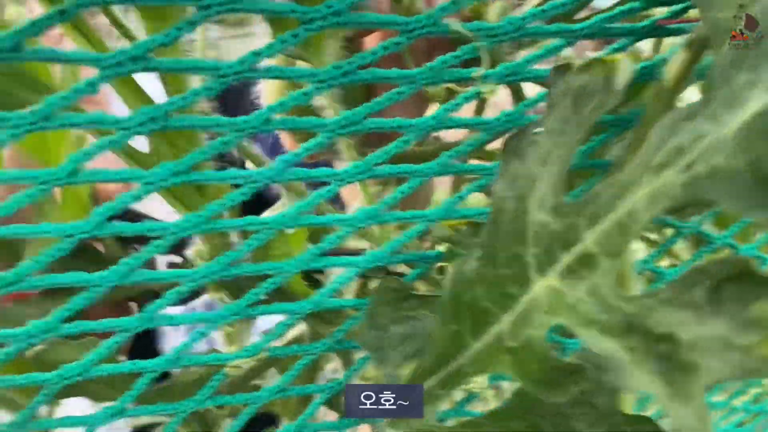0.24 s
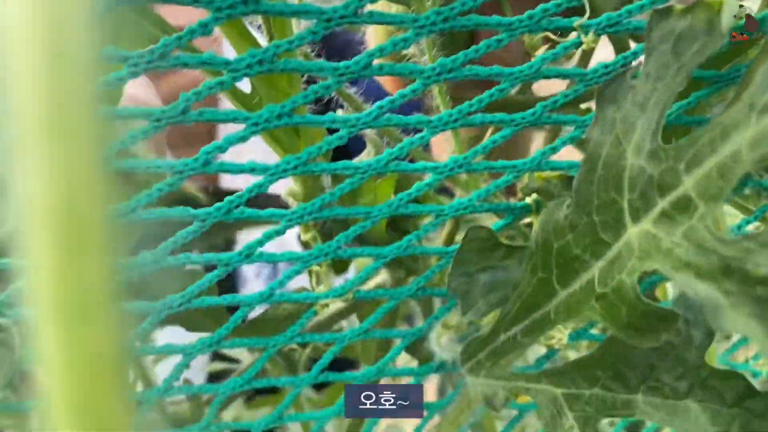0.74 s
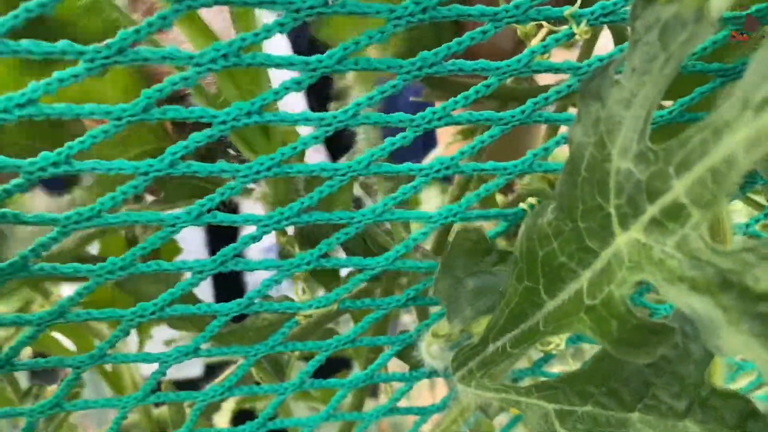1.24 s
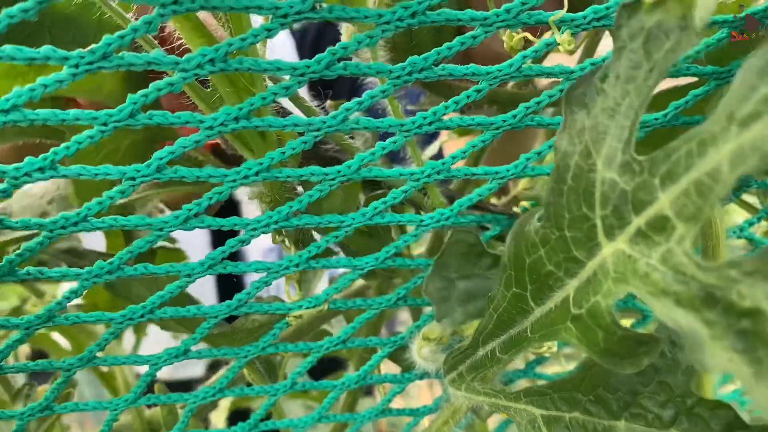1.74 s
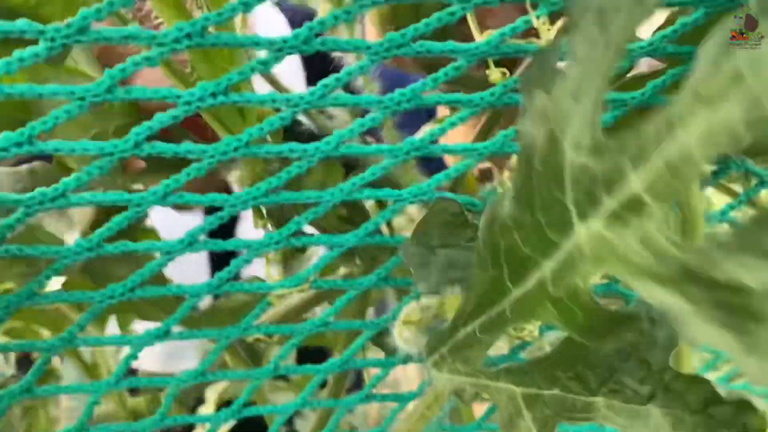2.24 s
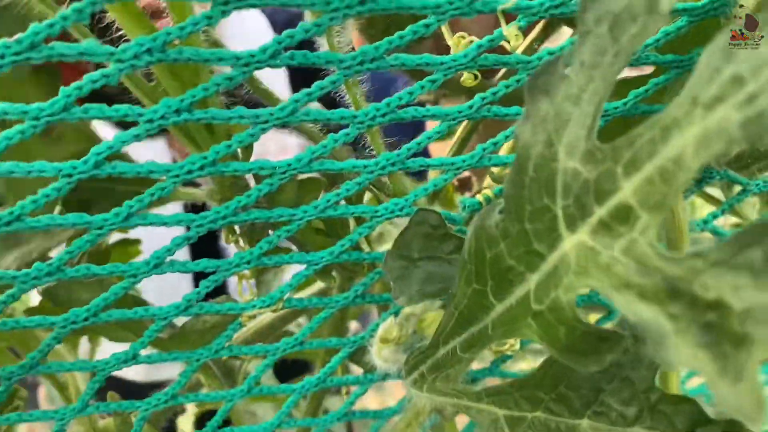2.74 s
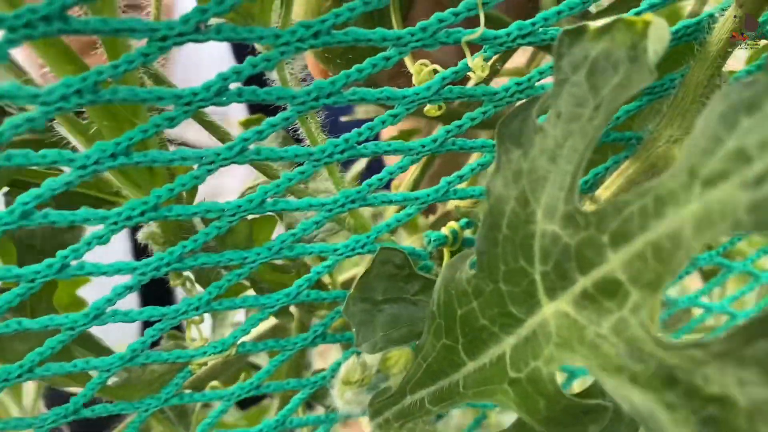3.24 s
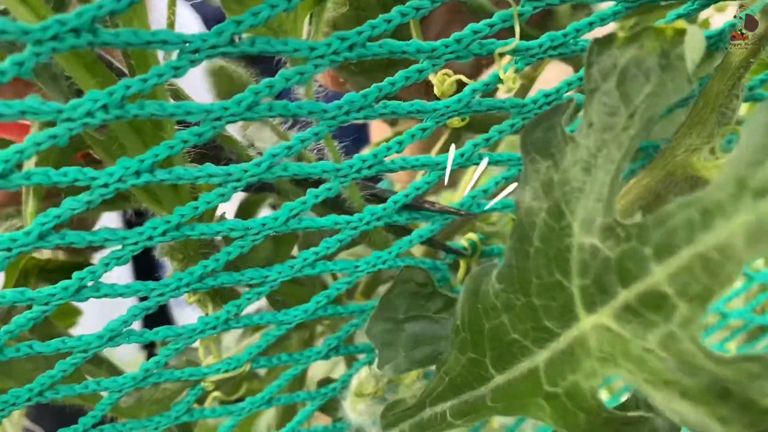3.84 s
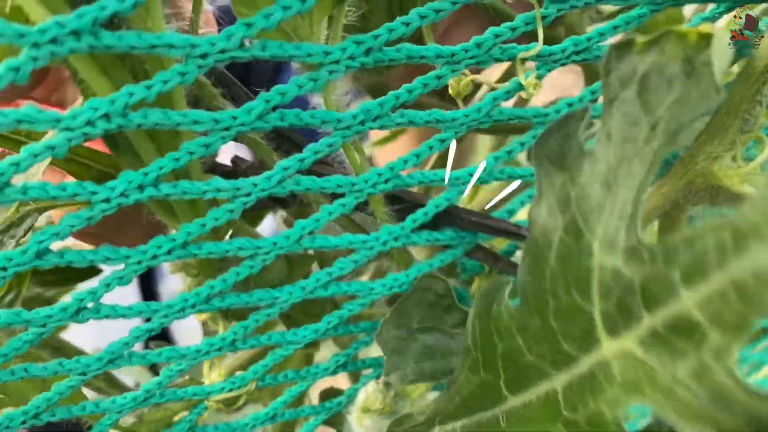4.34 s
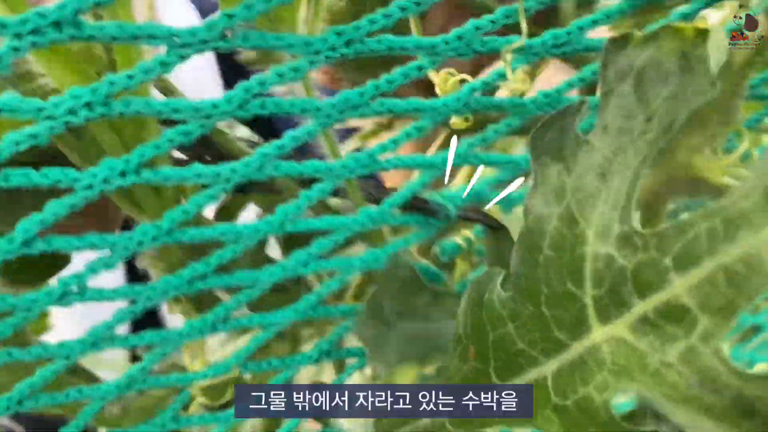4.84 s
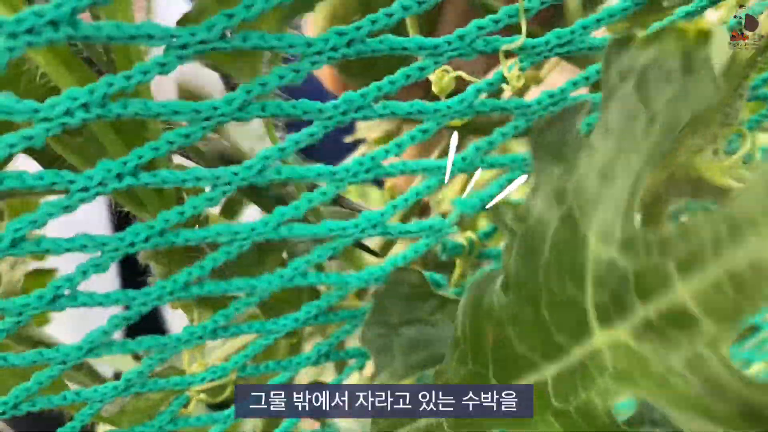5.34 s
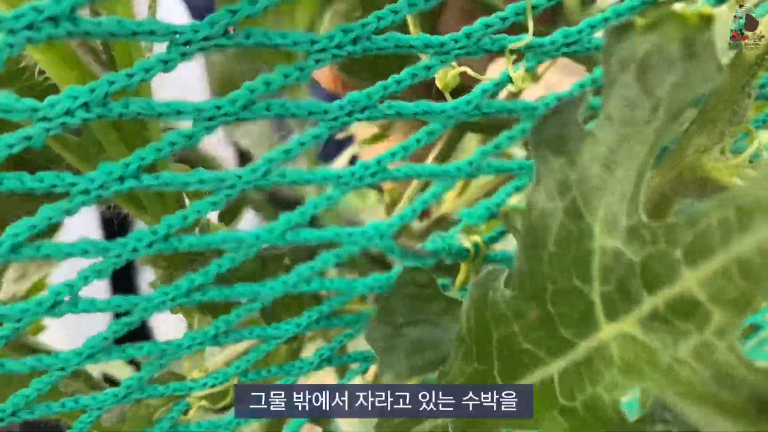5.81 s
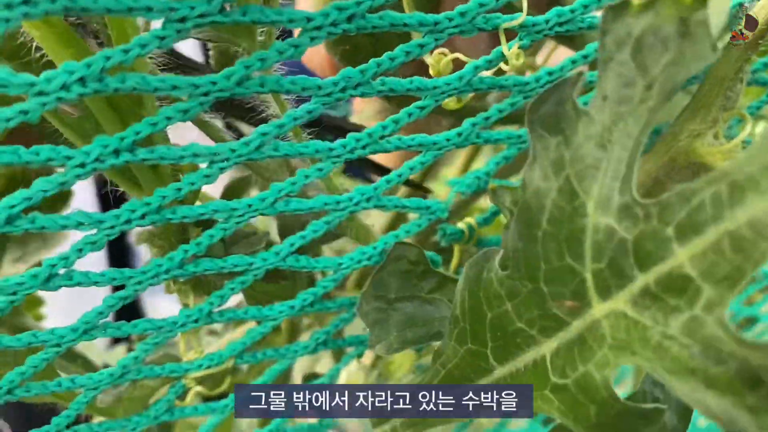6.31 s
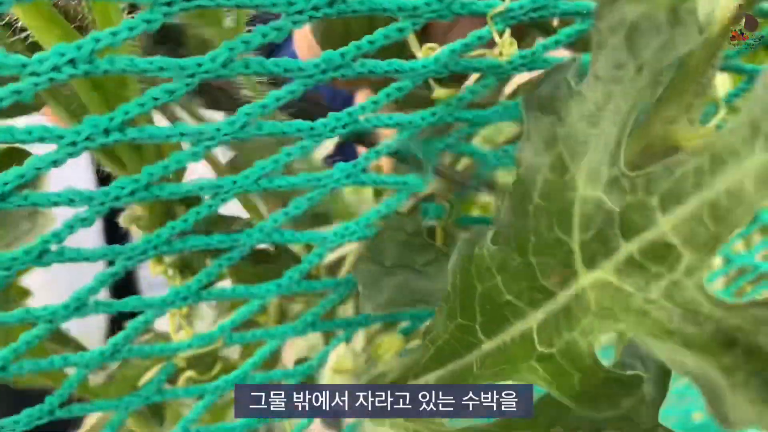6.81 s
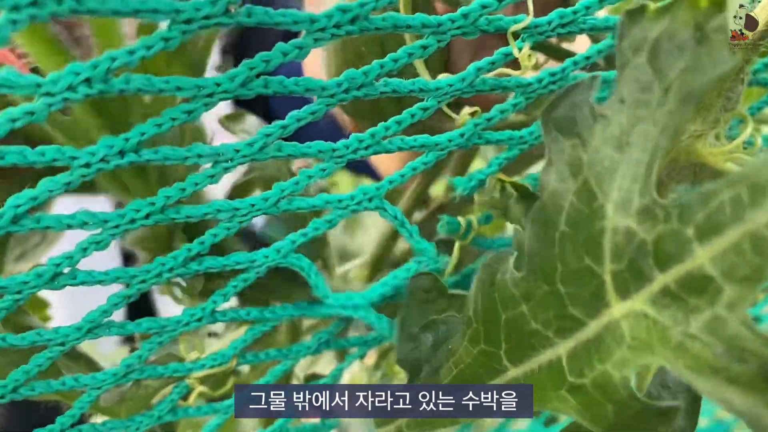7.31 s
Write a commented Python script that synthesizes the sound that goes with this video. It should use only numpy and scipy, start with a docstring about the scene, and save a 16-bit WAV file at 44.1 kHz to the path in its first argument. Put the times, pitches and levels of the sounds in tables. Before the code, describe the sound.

Hairy leaves scrape and crackle in uneven strokes close to a stereo microphone in a garden. Plastic netting creaks lightly at first, and stalks bump against it. Shears snip sharply through a stem about two seconds in, then crunch through another past the middle, where the sound is closer and duller. Rustling and sharp clicks continue to the end. Behind are a low rumble, a far engine, light breeze and a few faint chirps.

```python
"""A melon patch behind plastic garden netting, hands and shears at work near a stereo microphone.
Hairy leaves scrape and crackle, stalks knock on the net and squeak on the twine, and two stems
crunch as their fibres give way. The stretch around the second cut is heard from a closer, duller
position. Behind lie faint bird chirps, puffs of breeze, a low outdoor rumble and a far engine."""
import sys
import numpy as np
from scipy import signal
from scipy.fft import rfft, irfft, next_fast_len
from scipy.io import wavfile
from scipy.ndimage import uniform_filter1d

SR = 44100
rng = np.random.default_rng(int(sys.argv[2]) if len(sys.argv) > 2 else 0)


def unload_audio(sound):
    """Save the sound as a 16-bit wav file, at the path given as the first command line argument."""
    columns = np.transpose(np.atleast_2d(sound))
    # keep every value between -1 and 1, then stretch to whole-number steps
    steps = np.round(np.clip(columns, -1, 1) * 32767)
    wavfile.write(sys.argv[1], SR, steps.astype(np.int16))


N = 333611
TIME = np.arange(N) / SR
CLOSE_FROM_S, CLOSE_TO_S = 3.797, 5.68
IS_CLOSE = uniform_filter1d(1. * ((TIME > CLOSE_FROM_S) & (TIME < CLOSE_TO_S)), size=128)


# Strokes through the leaves. Each row: peak time, rise and fall in seconds, scrape level in dB,
# blade offset in dB.
STROKES = [(.09, 0.36, 0.25, -65, -4), (0.317, 0.09, 0.04985, -53, -1),
           (0.418, 0.031, 0.03504, -54.5, -0.5), (.68, 0.0916, 0.13, -54.5, -6),
           (.95, 0.407, 0.285, -66.5, 6.5), (1.09, 0.077, 0.019, -58.5, -1),
           (1.245, 0.031, 0.033, -48.5, -2.5), (1.44, 0.07165, 0.156, -61, -8),
           (1.67, 0.15, 0.118, -63, 1.5), (1.866, 0.051, 0.058, -53, -4.5), (2.11, 0.061, 0.032, -53.5, -4),
           (2.31, 0.0565, 0.1176, -56.5, -3), (3.0, 0.15, 0.1863, -55.5, -5.5),
           (3.425, 0.025, 0.04717, -53, -18), (3.51, 0.186, 0.091, -54, -5),
           (3.7, 0.01087, 0.03592, -52, -4), (3.823, 0.0072, 0.01882, -51.5, -2.5),
           (4.09, 0.075, 0.07, -48.5, -2.5), (4.389, 0.041, 0.07, -49, -4.5),
           (4.49, 0.0406, 0.0357, -59.5, 3), (4.67, 0.1044, 0.091, -45, 0.5), (5.03, 0.041, 0.136, -51, 1),
           (5.15, 0.29, 0.15, -55.5, 4.5), (5.63, 0.087, 0.1106, -57, -2), (5.79, 0.029, 0.088, -60.5, -2),
           (5.875, 0.046, 0.032, -50, 1.5), (6.051, 0.082, 0.08452, -57, -2.5),
           (6.47, 0.01265, 0.075, -59, 2), (6.63, 0.13, 0.112, -50.5, -2), (6.831, 0.013, 0.033, -45, 2.5),
           (6.91, 0.053, 0.077, -52, -0.5), (7.1, 0.083, 0.2242, -61.5, -1),
           (7.31, 0.04502, 0.12, -51.5, -6), (7.48, 0.041, 0.072, -57.5, -1)]

def rubbing(rest_db=-74, rest_blade_db=4.5, blade_gain_db=5.2, split_hz=2400, shape=1.114):
    """Leaf hairs scrape brightly with each stroke; a firmer push sounds the whole leaf blade too."""
    t = TIME[::32]
    hair_power, blade_power = undb(rest_db) ** 2, undb(rest_db + rest_blade_db) ** 2
    for s, rise_s, fall_s, db, blade_db in STROKES:
        from_peak = np.maximum((s - t) / rise_s, (t - s) / fall_s)
        power = undb(db) ** 2 * np.exp(-2 * np.minimum(from_peak, 10) ** shape)
        hair_power += power
        blade_power += power * undb(blade_db) ** 2
    hairs = np.interp(TIME, t, np.sqrt(hair_power)) * butter(friction(), split_hz, "high")
    blade = np.interp(TIME, t, np.sqrt(blade_power)) * butter(friction(), split_hz, "low")
    return undb(3.5 + 0.8 * walk(30)) * (hairs + undb(blade_gain_db) * blade)


def friction(hiss_db=-7, spurt_db=2.5, crinkle_db=-10, close_boost_db=6.5):
    """Dense slips in uneven spurts over a smooth hiss; dry crinkles stand out from close by."""
    slips = undb(-2.5 + spurt_db * walk(80)) * grains(N, per_s=2800, spread_db=2)
    folds = undb(crinkle_db + close_boost_db * IS_CLOSE) * crinkles()
    return slips + folds + undb(hiss_db) * rng.standard_normal(N)


def crinkles(count=1500, low_hz=900, high_hz=11000, decay_cycles=1.85, spread_db=3):
    """Small folds of leaf pop, each with a brief pitch of its own; rms 1."""
    when, pitch, size = rng.random((count, 3)).T[:, :, None]
    hz = low_hz * (high_hz / low_hz) ** pitch
    steps = np.arange(256)
    cycles = hz * steps / SR
    strength = hz * undb(-spread_db * np.log(size + .02))
    pops = strength * np.sin(2 * np.pi * cycles) * np.exp(-cycles / decay_cycles)
    positions = (when * N).astype(int) + steps
    return unit(np.bincount(positions.ravel(), pops.ravel(), N)[:N])


# Leaf and twine crackles, and at 3.7986 s the click as the scene changes to the close position. Each row: start
# in seconds, level in dB, thud offset in dB, decay in seconds.
CRACKLES = [(.413, -48.5, 2, 0.0049), (1.2306, -23, -29, 0.00093), (1.834, -49, 0.5, 0.0039),
            (2.012, -53, -9, 0.008), (2.757, -49.5, -2, 0.0069), (2.9625, -40, 2, 0.00045),
            (3.42, -35.5, -26, 0.001146), (3.429, -36, -23.5, 0.001518), (3.686, -38, -18.5, 0.002063),
            (3.7986, -37.5, -34, 0.0022), (4.2035, -45, 0, 0.0013), (4.3286, -36.5, -18.5, 0.00103),
            (4.3507, -38.5, -9, 0.000961), (4.3584, -36.5, -14, 0.001893), (4.377, -30.5, -22.5, 0.002087),
            (4.393, -29, -23, 0.0011), (4.553, -38, -12, 0.0039), (4.6149, -36.5, -5, .002),
            (4.6993, -33.5, 8.5, 0.0025), (4.889, -49.5, 8, 0.001777), (5.016, -41, -11.5, 0.0033),
            (5.0248, -37.5, -3, .0015), (5.041, -47, -2, 0.00089), (5.1153, -21.5, -36, 0.0018),
            (5.1565, -34.5, -7, 0.0012), (5.205, -51, 11, 0.001103), (5.857, -30.5, -6, 0.003),
            (5.869, -41, 0, 0.00298), (6.1, -45.5, -24.5, 0.003737), (6.451, -37, -5.5, 0.000668),
            (6.621, -35, -6, 0.00114), (6.641, -30.5, -13.5, 0.003133), (6.6645, -21.5, -13, 0.00062),
            (6.6828, -39, -4.5, 0.0038), (6.7432, -39.5, -13, 0.00061), (6.8139, -35, -14, 0.0022),
            (6.826, -47, -8, 0.00205), (6.834, -31.5, -17, 0.004), (7.2525, -39.5, -12, 0.0008),
            (7.29, -39, -4, 0.0015)]

def crackles(thud_gain_db=5, split_hz=2400, snap_db=-3, snap_s=.002, shiver_db=-20, shiver_s=.015):
    """A leaf buckles or slips off the twine: fractures, then a shiver. The briefest snap sharply."""
    out, t = np.zeros(N), TIME[:SR // 10]
    for s, db, thud_db, decay_s in CRACKLES:
        envelope = np.exp(-t / decay_s) + undb(shiver_db) * np.exp(-t / shiver_s)
        burst = grains(len(t), per_s=11000, spread_db=0.5) * envelope
        burst[0] = undb(snap_db) * np.exp(-decay_s / snap_s) * np.linalg.norm(burst)
        burst *= np.linalg.norm(envelope) / np.linalg.norm(burst)
        crack, thud = butter(burst, split_hz, "high"), butter(burst, split_hz, "low")
        add(out, s, undb(db) * (crack - undb(thud_db + thud_gain_db) * thud))
    return out


# Stages of the two cuts. Each row: peak time in seconds, level in dB, rise and fall in seconds,
# ring pitch in Hz, ring offset in dB.
CUT_STAGES = [(2.0947, -21, 0.0016, 0.0039, 1290, -5.5), (2.1002, -8.5, 0.00005, 0.00078, 7800, -3),
              (2.1015, -25, .0002, 0.0048, 3530, -6), (4.645, -20.5, 0.005, 0.0067, 2300, -2),
              (4.652, -15.5, 0.002, 0.0048, 2150, -1), (4.667, -29.5, 0.00282, 0.0023, 2020, -11.5)]

def cuts(q=5):
    """Shears crush through a stem: fractures swell and die away, ringing stem and blades."""
    out, t = np.zeros(N), TIME[:SR // 10] - 1 / 20
    for s, db, rise_s, fall_s, hz, ring_db in CUT_STAGES:
        envelope = np.exp(-np.maximum(-t / rise_s, t / fall_s))
        fibres = grains(len(t), per_s=24000, spread_db=4) * envelope
        crunch = unit(fibres) + undb(ring_db) * unit(ring(fibres, hz, q))
        crunch *= np.linalg.norm(envelope) / np.linalg.norm(crunch)
        add(out, s + t[0], undb(db) * crunch)
    return out


# Stalks against the net, and the low thumps of the two cuts (rows at 2.102, 4.651 and 4.66 s). Each row: start
# in seconds, level in dB, pitch in Hz.
KNOCKS = [(0.704, -46, 594), (0.725, -39, 388.5), (1.055, -52.5, 1400), (1.1165, -48, 1467),
          (1.231, -33, 1380), (2.095, -31, 1000), (2.102, -28.5, 410), (3.036, -52, 1399),
          (3.555, -46.5, 988.4), (3.589, -50.5, 1110), (3.685, -43, 970), (4.651, -28, 497),
          (4.66, -34, 290), (5.858, -31.5, 575), (6.834, -41.5, 900), (6.995, -39.5, 1060)]

def knocks(gain_db=-6, push_s=0.0027, q=.9, hollow_db=-2, decay_cycles=1.4):
    """Soft stalks bump the net and cut stems thump: a dry scuff and a hollow ring, damped within a few cycles."""
    out, t = np.zeros(N), TIME[:SR // 20]
    for s, db, hz in KNOCKS:
        push = rng.standard_normal(len(t)) * np.exp(-t / push_s)
        scuff = butter(ring(push, hz, q), 2 * hz, "low", order=4)
        scuff /= np.abs(scuff).max()
        hollow = np.sin(2 * np.pi * hz * t) * np.exp(-hz * t / decay_cycles)
        add(out, s, 2 * undb(db + gain_db) * (scuff + undb(hollow_db) * hollow))
    return out


# Ticks of the creaking net. Each row: start in seconds, level in dB.
CREAK_TICKS = [(0.084, -49), (0.1379, -46), (0.1485, -43), (.177, -51), (.197, -53), (.2162, -48),
               (0.2303, -51), (0.2535, -45), (0.2694, -46), (.294, -51), (.334, -44), (0.4503, -46.5),
               (0.4759, -47), (0.499, -49), (.593, -44)]

def creak(centre_hz=1200, decay_s=0.0004, pitch_spread=0.18):
    """Taut twine sticks and slips over a stalk: dry ticks, each at a slightly different pitch."""
    out, t = np.zeros(N), TIME[:SR // 100]
    for s, db in CREAK_TICKS:
        hz = centre_hz * np.exp(pitch_spread * rng.standard_normal())
        add(out, s, 2 * undb(db) * np.sin(2 * np.pi * hz * t) * np.exp(-t / decay_s))
    return out


# Short squeaks and long soft rubs. Each row: peak time and half width in seconds, pitch in Hz,
# level in dB.
SQUEAKS = [(0.161, 0.082, 2200, -69.5), (0.941, .12, 2330, -66.5), (6.524, 0.0079, 2680, -62),
           (6.585, 0.0234, 2300, -61), (6.686, 0.00484, 2370, -52)]

def squeaks(q=4):
    """A stalk drags over taut twine: quick uneven slips ring it at a new pitch with each pull."""
    out, t = np.zeros(N), TIME[:SR // 5] - 1 / 10
    for s, half_s, hz, db in SQUEAKS:
        slips = grains(len(t), per_s=900, spread_db=2)
        twine = unit(ring(ring(slips, hz, q), hz, q))
        add(out, s + t[0], undb(db) * bell(t, half_s) * twine)
    return out


# Single chirps. Each row: start and length in seconds, first, middle and last pitch in Hz, level in dB.
CHIRPS = [(2.768, 0.039, 2640, 2720, 2813, -57.5), (2.793, 0.043, 1670, 1560, 1550, -60),
          (3.23, 0.0992, 2210, 2020, 1987, -67), (5.917, 0.03, 4501, 4190, 3986, -54)]
# The nearest bird's call: a lisp, a high arch, a lower arch. Rows as in CHIRPS, timed within the call.
CALL_NOTES = [(0, 0.016, 5600, 5600, 5500, -53), (.01, 0.0243, 3610, 5300, 4700, -45.5),
              (0.04, .024, 3450, 3900, 3150, -50)]
# Its calls. Each row: start in seconds, gain in dB.
CALLS = [(2.87, 3), (6.367, -1.5)]

def birds(echo_db=-6, echo_s=0.035, right_db=-11):
    """Short, thin whistles off to the left, with a little garden echo."""
    out = np.zeros(N)
    notes = [(s + delay_s, *shape, db + gain_db)
             for s, gain_db in CALLS for delay_s, *shape, db in CALL_NOTES]
    for s, length_s, *pitches_hz, db in CHIRPS + notes:
        progress = np.linspace(0, 1, int(length_s * SR))
        arch_hz = np.polyval(np.polyfit([0, .5, 1], pitches_hz, 2), progress)
        jitter = uniform_filter1d(rng.standard_normal(len(progress)), size=48)
        whistle = np.sin(phase(arch_hz * (1 + .22 * jitter)))
        add(out, s, undb(db) * np.sin(np.pi * progress) * whistle)
    return np.array([out, undb(right_db) * out]) + undb(echo_db) * scatter(out, echo_s, count=1)


# Puffs of breeze. Each row: start and end in seconds, level in dB.
PUFFS = [(0, 0.756, -53), (5.699, 7.7, -52.5)]

def breeze(low_hz=60, high_hz=130, fade_s=0.052, flutter_db=2):
    """Light wind flutters on each microphone port separately."""
    strength = sum(undb(db) * np.clip(np.minimum(TIME - start_s, end_s - TIME) / fade_s, 0, 1)
                   for start_s, end_s, db in PUFFS)
    eddies = [unit(butter(butter(noise, low_hz, "high"), high_hz, "low"))
              for noise in rng.standard_normal((2, N))]
    return strength * undb(flutter_db * walk(8.2)) * np.array(eddies)


# Swell of the rumble. Each row: time in seconds, level in dB.
RUMBLE_SWELL = [(0, -48), (0.25, -47.5), (0.47, -56), (0.7, -47), (1.3, -47.5), (1.9, -48.5), (2.6, -47.5),
                (2.9, -49), (3.7, -47), (4.7, -50), (5.15, -47), (5.45, -50.5), (5.9, -51), (6.4, -55.5),
                (6.7, -50.5), (7.1, -54), (7.33, -56), (7.56, -57)]
# Its spectrum at each position. Each row: frequency in Hz, relative level in dB.
RUMBLE_WIDE = [(15, -49), (25, -15), (33, -1), (54, -9.5), (68, -2.5), (86, -0.5), (169, -8), (194, -10),
               (226, -8.5), (299, -17.5), (374, -17.5), (470, -18.5), (540, -37.5), (700, -43), (910, -45),
               (1540, -120)]
RUMBLE_CLOSE = [(12, -36), (20, -9), (49, -3.5), (125, -21), (230, -28.5), (296, -33), (400, -37),
                (520, -35.5), (880, -120)]

def rumble(spectrum, gain_db, side_db, upper_side_db, upper_hz):
    """Far outdoor rumble, nearly alike at both ports in the bass and wider above."""
    mid, side = (colour(noise, spectrum) for noise in rng.standard_normal((2, N)))
    side = undb(side_db) * side + undb(upper_side_db) * butter(side, upper_hz, "high")
    swell_db = np.interp(TIME, *np.transpose(RUMBLE_SWELL))
    return undb(swell_db + gain_db) * np.array([undb(-2.2) * mid + side, mid - side])


# Engine partials. Each row: multiple of the pitch, level in dB.
ENGINE_PARTIALS = [(1, -55.5), (1.5, -63), (2, -66)]

def engine(hz=85, waver=0.03066):
    """A far engine's wavering hum comes up, holds and recedes."""
    angle = phase(hz * (1 + waver * walk(14)))
    swell_db = np.interp(TIME, [0, .8, 3.2, 5.8, 7.5], [-9, 2.5, 2.5, -0.5, -4.5])
    hum = sum(undb(db + swell_db + 2 * walk(9)) * np.sqrt(2) * np.sin(multiple * angle)
              for multiple, db in ENGINE_PARTIALS)
    return np.array([undb(-2) * hum, hum])


# Distant tones. Each row: peak time and half width in seconds, pitch in Hz, level in dB.
FAR_TONES = [(1.528, 0.091, 383, -62.5), (1.876, 0.052, 463, -60), (2.352, 0.11, 383.5, -59.5)]

def far_tones(waver=0.01216):
    """Faint wavering tones come and go in the distance."""
    angle_per_hz = phase(1 + waver * walk(20))
    return sum(undb(db) * bell(TIME - s, half_s) * np.sin(hz * angle_per_hz)
               for s, half_s, hz, db in FAR_TONES)


# Spectrum of the hiss. Each row: frequency in Hz, relative level in dB.
AIR_SPECTRUM = [(300, 7), (600, 10), (1000, 9), (2200, 7.5), (3600, 6.5), (5500, 1.5), (6800, 6),
                (7700, 15.5), (9000, -18), (16000, -6)]

def air(db=-64.5):
    """Faint hiss of the microphones."""
    level = undb(db + 0.36 * walk(3.6))
    return level * np.array([colour(noise, AIR_SPECTRUM) for noise in rng.standard_normal((2, N))])


def scatter(x, decay_s, count=4):
    """Dense reflections from swaying foliage: paths fade into each other and differ at each port."""
    t = TIME[:int(6 * decay_s * SR)]
    out = np.zeros((2, N))
    shares = np.array([walk(9) for _ in range(count)])
    for share in shares / np.linalg.norm(shares, axis=0):
        echoes = rng.standard_normal((2, len(t))) * np.exp(-t / decay_s)
        out += share * np.array([signal.oaconvolve(x, e / np.linalg.norm(e))[:N] for e in echoes])
    return out


# Phase between the ports at each position. Each row: frequency in Hz, left lead in radians.
PORTS_WIDE = [(0, 0), (400, -.9), (1000, -5.2), (3000, -5.7), (4500, -6.5), (6900, -6.3), (16000, -19.4)]
PORTS_CLOSE = [(0, 0), (250, -.4), (700, -3.6), (1400, -5), (2100, -7), (3200, -5.5), (4450, -9.4),
               (10000, -25.4)]

def ports(x, phases, scatter_db, scatter_hz, scatter_s):
    """A near sound reaches the two microphone ports out of step; foliage scatters its lower part."""
    size = next_fast_len(N + 2048)
    lead_rad = np.interp(np.fft.rfftfreq(size, 1 / SR), *np.transpose(phases))
    left = irfft(rfft(x, size) * np.exp(1j * lead_rad), size)[:N]
    return np.array([left, x]) + undb(scatter_db) * butter(scatter(x, scatter_s), scatter_hz, "low")


def grains(count, per_s, spread_db):
    """Tiny fractures and slips of uneven size; rms 1."""
    happens = rng.random(count) < per_s / SR
    sizes = undb(spread_db * np.minimum(rng.exponential(size=count), 5))
    return unit(happens * sizes * rng.choice([-1, 1], count) + 1e-9)


def walk(per_s):
    """Smooth random drift; rms 1."""
    return unit(np.interp(TIME * per_s, np.arange(4096), rng.standard_normal(4096)))


def colour(x, points, size=8192):
    """Minimum-phase filter through (Hz, dB) points; keeps the power of white noise."""
    hz, db = np.transpose(points)
    bins_hz = np.maximum(np.fft.rfftfreq(size, 1 / SR), 1)
    cepstrum = irfft(np.log(undb(np.interp(np.log(bins_hz), np.log(hz), db))))
    cepstrum[1:size // 2] *= 2
    cepstrum[size // 2 + 1:] = 0
    response = irfft(np.exp(rfft(cepstrum)))
    return signal.fftconvolve(x, response / np.linalg.norm(response))[:N]


def ring(x, hz, q):
    """One resonance; keeps the power of white noise."""
    return signal.lfilter(*signal.iirpeak(hz, q, fs=SR), x) * np.sqrt(SR * q / (np.pi * hz))


def butter(x, hz, kind, order=2):
    """Low-pass or high-pass."""
    return signal.sosfilt(signal.butter(order, hz, kind, fs=SR, output="sos"), x)


def cut_top(x, hz):
    """Steep low-pass."""
    return signal.sosfilt(signal.ellip(10, .2, 80, hz, fs=SR, output="sos"), x)


def bell(t, half_s):
    """Gaussian swell around t = 0."""
    return np.exp(-(t / half_s) ** 2 / 2)


def phase(hz):
    """Running phase in radians."""
    return 2 * np.pi * np.cumsum(hz) / SR


def undb(db):
    """Decibels to gain."""
    return 10 ** (np.asarray(db) / 20)


def unit(x):
    """Scale to rms 1."""
    return x / np.sqrt(np.mean(x ** 2))


def add(track, s, sound):
    """Mix a sound into a track at s seconds."""
    start = max(int(s * SR), 0)
    track[start:start + len(sound)] += sound[:N - start]


# Leaf and stem tone at each position. Each row: frequency in Hz, relative gain in dB.
LEAF_WIDE = [(150, -2.5), (400, 2), (700, 3.5), (1300, -4), (1800, -4), (2400, 1.5), (3500, -1.5),
             (4600, 1), (5700, -1), (7600, 5), (10000, 2.5), (13000, 3.5), (16000, 1.5)]
LEAF_CLOSE = [(150, -0.5), (400, -1), (700, -2.5), (1300, .5), (1750, -4), (2150, 0.5), (2800, -4),
              (3700, 7.5), (4500, 2.5), (5400, 2.5), (7500, 6.5), (9500, 2.5)]
STEM_WIDE = [(100, -11), (330, 2), (700, -24), (1250, 5), (1900, -6.5), (2700, 6), (3500, 4.5), (4600, 7.5),
             (5700, -8.5), (8000, 10), (10000, 0.5), (16000, 2.5)]
STEM_CLOSE = [(130, 5), (220, -18), (450, -0.5), (650, 3.5), (900, -2), (1250, 5), (1600, -1), (2250, 0.5),
              (3000, -6), (5000, -0.5), (7500, 6), (9500, -0.5)]

def scene():
    """The work from two positions: the wide one lacks the deepest bass, the close one the top treble."""
    leaves = rubbing() + crackles()
    stems = cuts()
    stalks = knocks() + creak() + squeaks()
    work_wide = colour(leaves, LEAF_WIDE) + colour(stems, STEM_WIDE) + stalks
    wide = ports(work_wide, PORTS_WIDE, scatter_db=-1.5, scatter_hz=6400, scatter_s=.003)
    wide += rumble(RUMBLE_WIDE, gain_db=-2.5, side_db=-12, upper_side_db=3, upper_hz=416)
    wide += breeze() + engine() + far_tones() + birds()
    work_close = colour(leaves, LEAF_CLOSE) + colour(stems, STEM_CLOSE) + stalks
    close = ports(work_close, PORTS_CLOSE, scatter_db=1.5, scatter_hz=3107, scatter_s=.0036)
    close += rumble(RUMBLE_CLOSE, gain_db=1, side_db=-9, upper_side_db=-0.5, upper_hz=169)
    hiss = air()
    wide = butter(wide + hiss, hz=40.574, kind="high", order=6)
    close = cut_top(close + undb(-4) * hiss, hz=9650)
    return (1 - IS_CLOSE) * wide + IS_CLOSE * close


def record(dry):
    """The recorder cuts the highest treble."""
    return cut_top(dry, hz=15800)


dry = scene()
out = record(dry)
unload_audio(out)
```